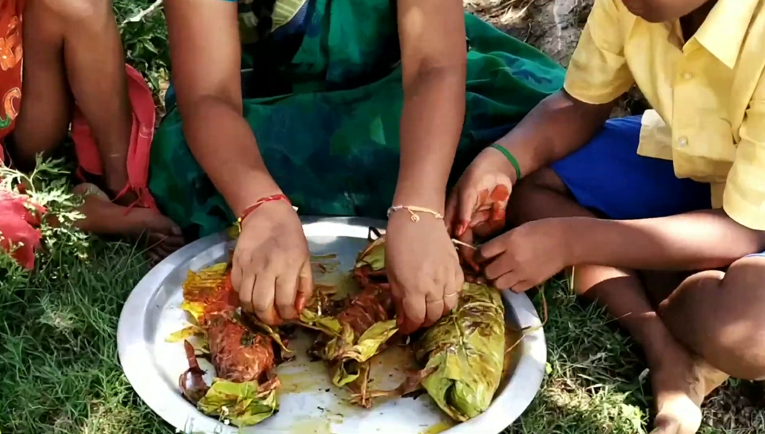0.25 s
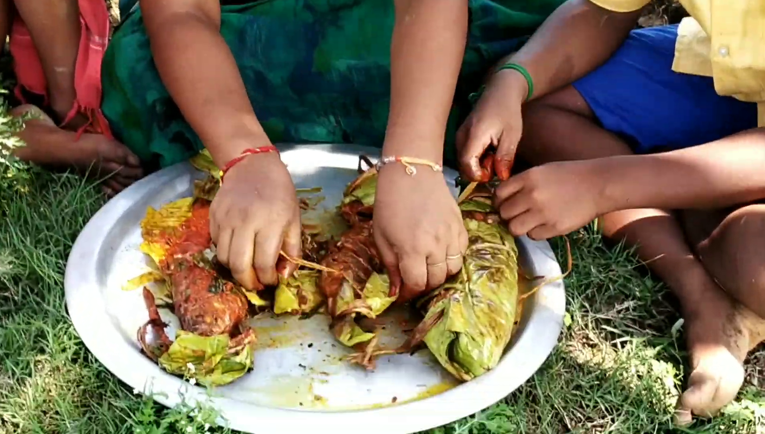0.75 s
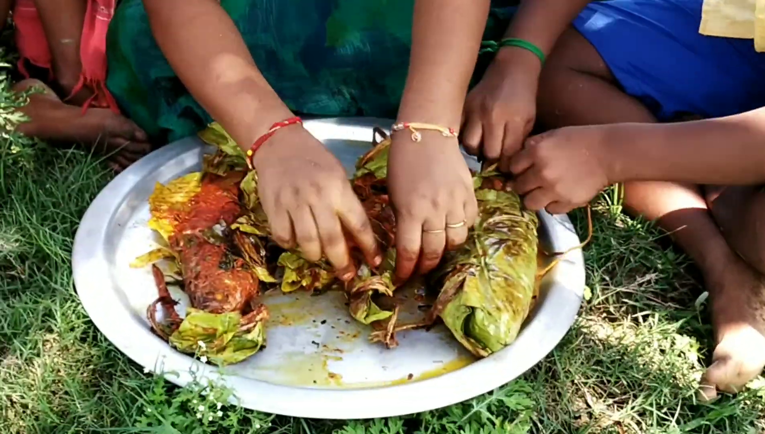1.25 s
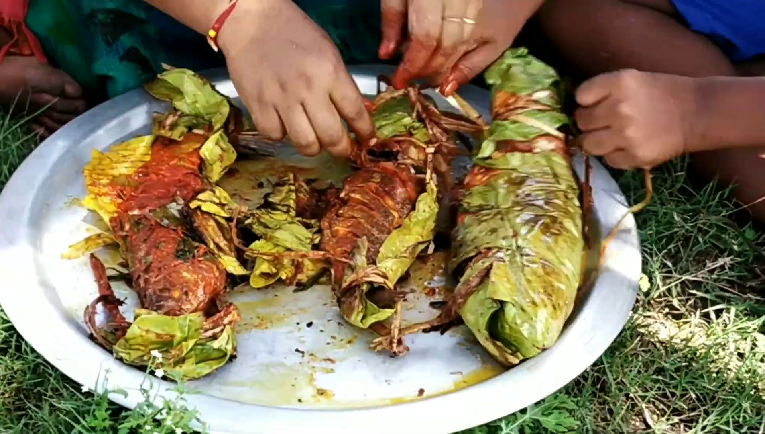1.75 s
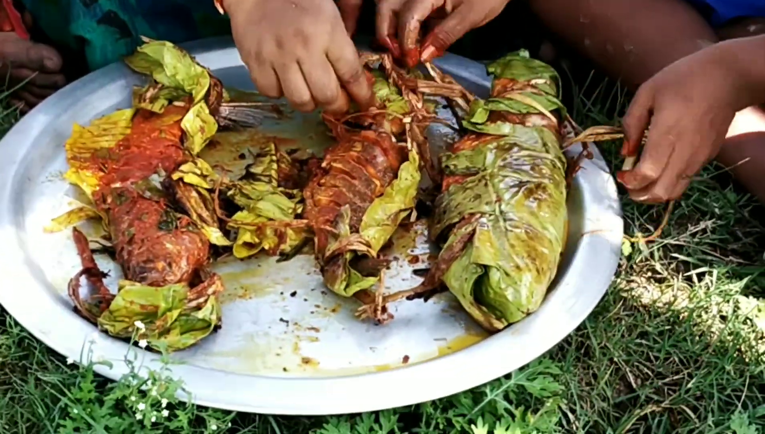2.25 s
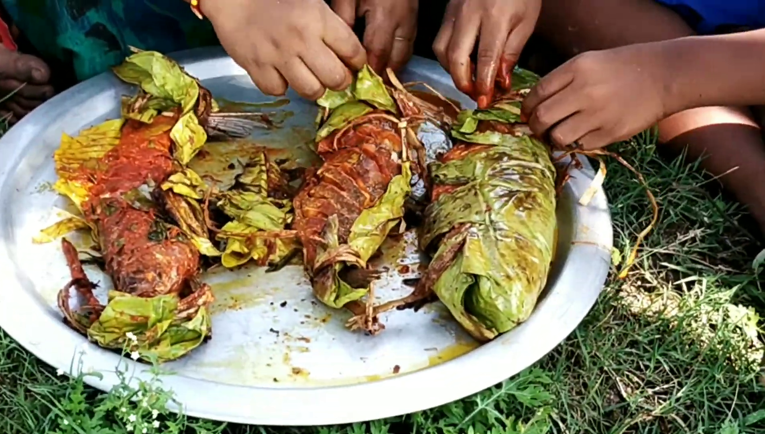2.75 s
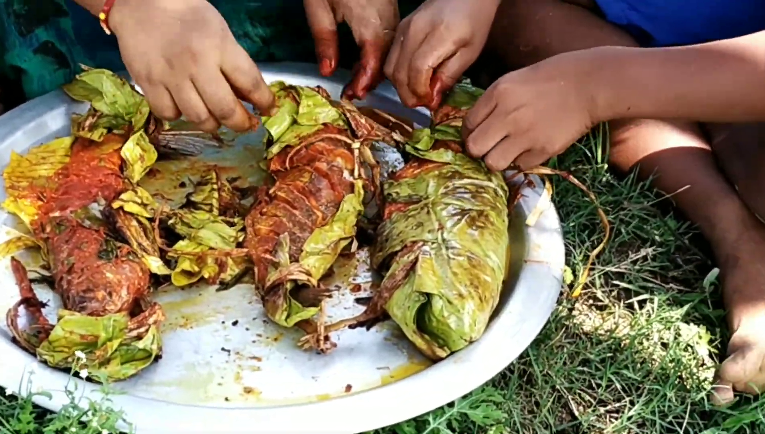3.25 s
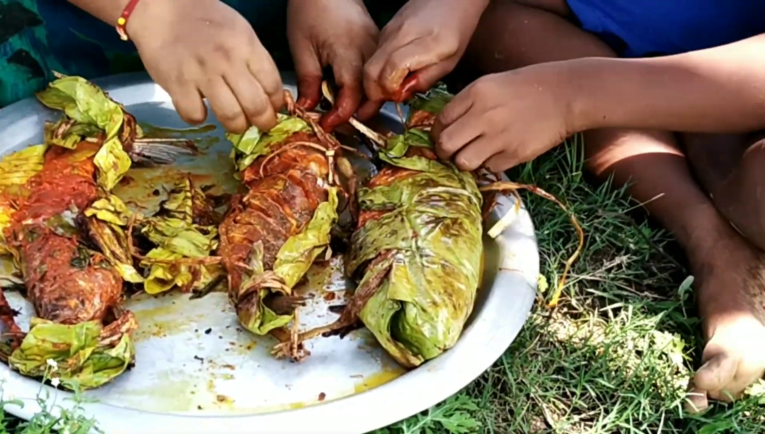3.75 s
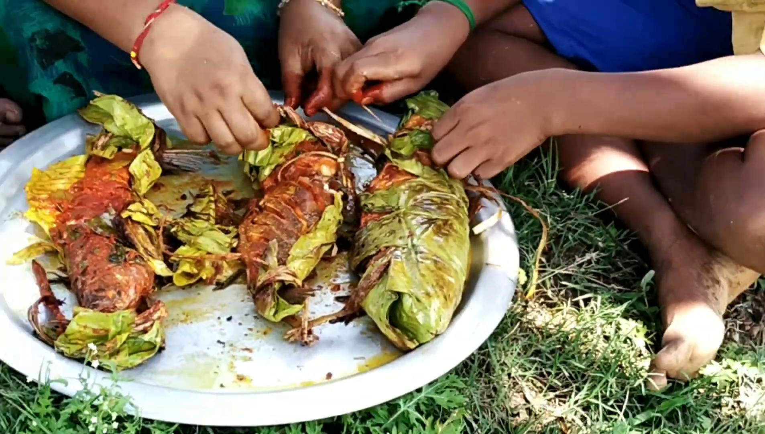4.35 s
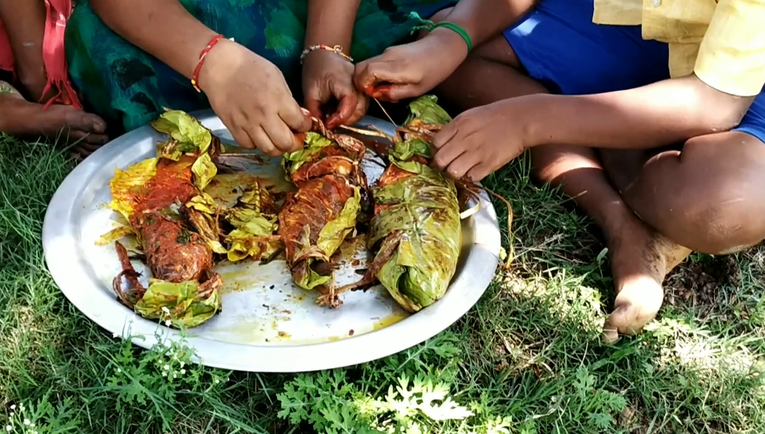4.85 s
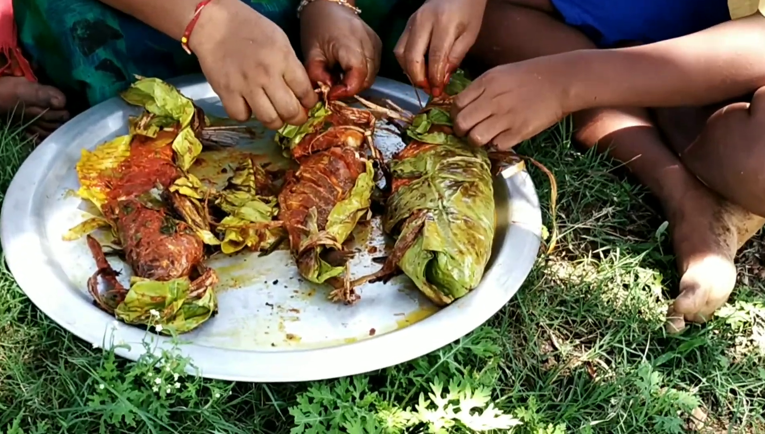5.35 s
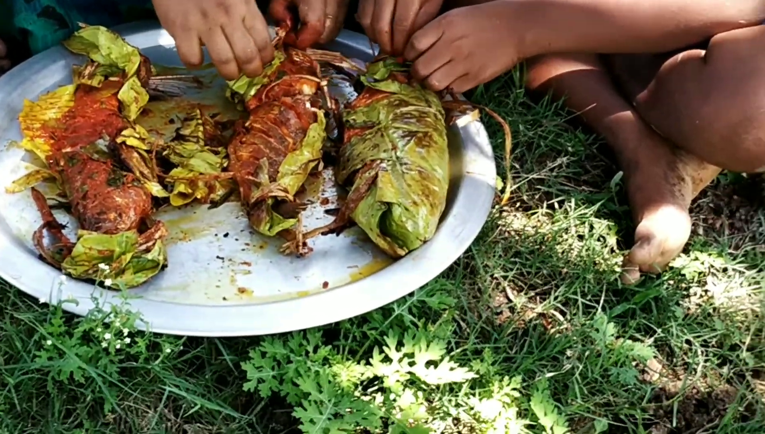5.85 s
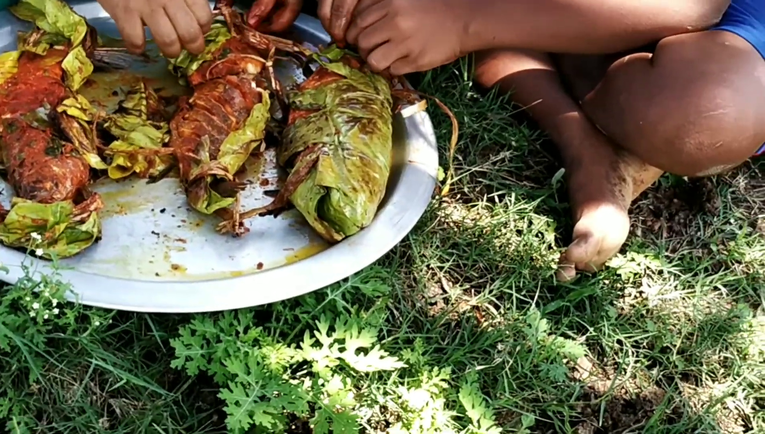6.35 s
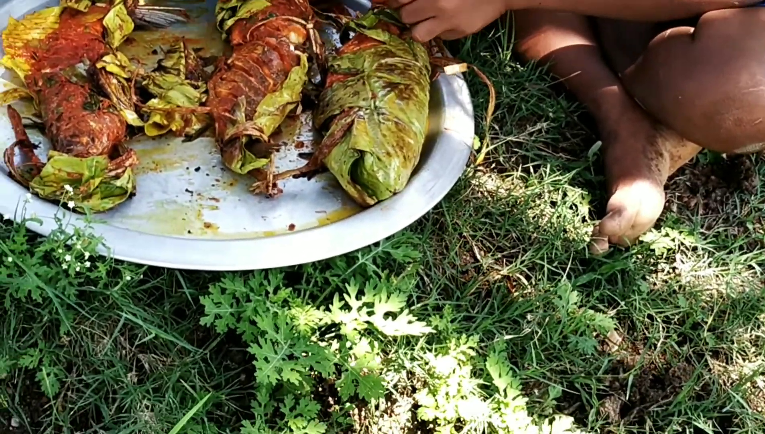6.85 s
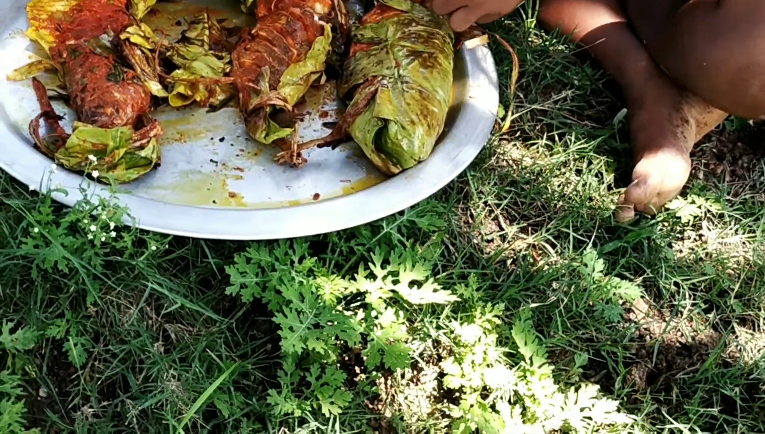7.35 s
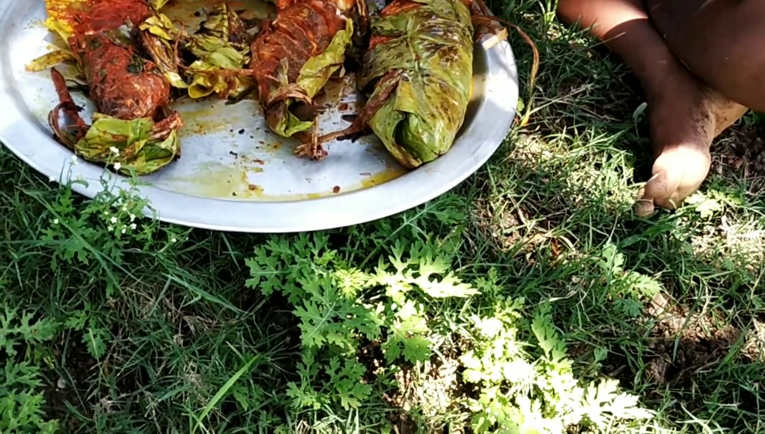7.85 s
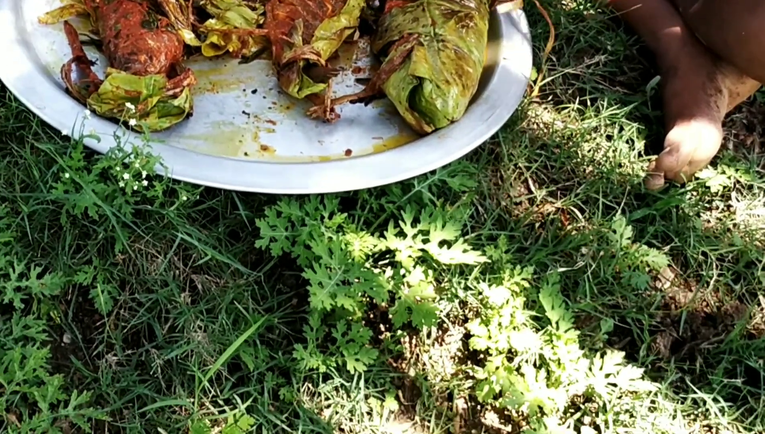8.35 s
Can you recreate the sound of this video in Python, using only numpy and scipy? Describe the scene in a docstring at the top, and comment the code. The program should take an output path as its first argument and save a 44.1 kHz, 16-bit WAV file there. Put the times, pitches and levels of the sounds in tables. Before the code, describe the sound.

Outdoors in a quiet field, a close cricket gives short, bright, pulsing chirps about two and a half times a second, with brief gaps. Low wind rumbles and flutters unevenly on a handheld phone microphone, strongest after six seconds. Fingers tick and bump its case, mostly on the left, with dull low thuds. Leaves crackle and swish faintly, and a far bird whistles thinly beneath a soft hiss.

```python
"""Open field: a cricket chirps steadily in the grass while a leaf wrapping is handled beside a phone.
The cricket is trains of sliding tones, direct, echoed and scattered. Wind on the phone's two ports is
shaped noise with swirls and push-pull pulses. Fingers tick, puff and drag on the case, setting off low
rings; the wrapping is short bursts and swells of band-passed noise. A far bird whistles over a soft hiss."""
import sys
import numpy as np
from scipy import signal
from scipy.fft import rfft, irfft
from scipy.io import wavfile
from scipy.ndimage import uniform_filter1d

SR = 44100
rng = np.random.default_rng(int(sys.argv[2]) if len(sys.argv) > 2 else 0)


def wav_record(signal):
    """Record a signal, one row per channel, as 16-bit PCM in the file named by sys.argv[1]."""
    frames = np.transpose(np.atleast_2d(signal))
    bounded = np.clip(frames, -1, 1)
    # unit amplitude maps onto the largest positive 16-bit level
    quanta = np.round(bounded * 32767).astype(np.int16)
    wavfile.write(sys.argv[1], SR, quanta)


N = 380009
TIME = np.arange(N) / SR


def undb(db):
    """Decibels to gain."""
    return 10 ** (np.asarray(db) / 20)


def unit(x):
    """Scale to rms 1."""
    return x / np.sqrt(np.mean(x ** 2))


def pan(db):
    """Left and right gains of mean power 1 for a left minus right level."""
    gains = undb(np.array([np.atleast_1d(db), -np.atleast_1d(db)]) / 2)
    return gains / np.sqrt(np.mean(gains ** 2, axis=0))


def add(out, s, x):
    """Mix a short sound in at s seconds."""
    start = max(int(s * SR), 0)
    out[:, start:start + x.shape[-1]] += x[..., :max(N - start, 0)]


def filt(x, hz, kind, order=2):
    """Butterworth filter."""
    hz = np.minimum(hz, SR / 2 - 1000)
    return signal.sosfilt(signal.butter(order, hz, kind, fs=SR, output="sos"), x)


def band(x, hz, ratio, order=2):
    """Band-pass from hz / (1 + ratio) to hz * (1 + ratio)."""
    return filt(x, [hz / (1 + ratio), hz * (1 + ratio)], "bandpass", order=order)


def noise(points):
    """Unrelated left and right noise of rms 1 with a (Hz, dB) spectrum that falls away at both ends."""
    hz, db = np.transpose(points)
    bins_hz = np.maximum(np.arange(N // 2 + 1) * SR / N, 1)
    skirts = np.minimum(bins_hz / hz[0], 1) ** 2 * np.minimum(hz[-1] / bins_hz, 1) ** 4
    gain = undb(np.interp(np.log(bins_hz), np.log(hz), db)) * skirts
    white = rng.standard_normal((2, N))
    return unit(irfft(rfft(white) * gain, N))


def walk(rate_hz):
    """Random curve with a spread near 1: normal knots at rate_hz joined by straight lines."""
    knots = rng.standard_normal(int(N / SR * rate_hz) + 2)
    return np.interp(TIME * rate_hz, np.arange(len(knots)), knots)


def air(gain_db=5, distant_db=-8, lag_samples=17):
    """Soft hiss of the open field; a part comes from the right and reaches the left port later."""
    # hiss spectrum: (frequency [Hz], level [dB])
    air_spectrum = [(150, -13), (300, -14), (450, -9), (725, -11), (1000, -13), (1390, -13.5), (2070, -12),
                    (2740, -13.5), (3520, -14.5), (6000, -15), (8200, -16), (10000, -19.5), (13000, -22.5),
                    (15000, -30)]
    # hiss before gain_db: (time [s], level [dB])
    hiss_level = [(0, -64.3), (1.2, -64.3), (3, -67.4), (8.6, -67.7)]
    distant = noise(air_spectrum)[0]
    from_right = np.array([np.roll(distant, lag_samples), distant])
    field = noise(air_spectrum) + undb(distant_db) * from_right
    return unit(field) * undb(gain_db + np.interp(TIME, *np.transpose(hiss_level)))


def bird(waver=0.022, echo_db=-5, echo_t60_s=0.53):
    """Thin whistles that waver and slide ever faster, blurred by distance and the trees."""
    # notes: (start [s], length [s], start pitch [Hz], fall [Hz], peak before echo [dB])
    notes = [(.47, 0.157, 2120, 90, -65), (2.677, 0.08, 2730, 480, -63.5), (3.056, 0.068, 2690, 300, -61),
             (3.223, .065, 1920, 50, -67), (3.444, 0.1, 2630, 514, -62.5), (3.648, 0.095, 2590, 857, -66.5),
             (3.849, 0.085, 2460, 262, -65), (4.049, 0.055, 2630, 403, -59), (4.247, 0.072, 2590, 332, -65),
             (4.867, .12, 4050, -300, -71), (5.218, 0.13, 2220, 118, -74), (8.382, 0.072, 2650, 124, -60.5)]
    out = np.zeros((2, N))
    for s, length_s, start_hz, fall_hz, db in notes:
        u = np.linspace(0, 1, int(length_s * SR))
        hz = start_hz * (1 + waver * walk(141)[:len(u)]) - fall_hz * u ** 2
        phase = 2 * np.pi * np.cumsum(hz) / SR
        add(out, s, undb(db) * np.sin(np.pi * u) * np.sin(phase))
    t = np.arange(SR // 2) / SR
    trees = rng.standard_normal((2, len(t))) * undb(-60 * t / echo_t60_s)
    echo = signal.fftconvolve(out, unit(trees) / np.sqrt(len(t)), axes=1)[:, :N]
    return out + undb(echo_db) * echo


def breeze(s):
    """Wind strength [dB re ordinary breeze] and left minus right port level [dB] at times s."""
    # breeze at the phone: (time [s], strength [dB], left minus right port [dB])
    gusts = [(0.0, -41, 3), (0.299, -48.5, 1.5), (0.75, -43.5, 14), (1.81, -52.5, -1), (1.96, -46, -1),
             (2.258, -51, 1.5), (3.32, -43.0, -2), (3.619, -44, 14), (3.921, -42.5, 1.5), (4.221, -41, 14),
             (5.281, -43.5, 6.5), (6.34, -40.0, -1), (6.789, -31, 1.5), (7.24, -33, 11), (7.694, -44.5, 3),
             (8, -32.5, 0.5), (8.3, -42.5, 11.5), (8.6, -45.5, -15.5)]
    ordinary_db = -45.5
    times, db, side_db = np.transpose(gusts)
    return np.interp(s, times, db) - ordinary_db, np.interp(s, times, side_db)


def wind(rumble_db=-41, flutter_db=-55.0, shelter_db=3.5, flutter_side_db=6.5):
    """Each port has its own eddies: slow rumble, and uneven flutter that grows faster with the breeze."""
    # spectra: (frequency [Hz], level [dB])
    rumble_spectrum = [(26, -27), (40, -2.5), (56, 2), (75, 2), (110, -4.5), (160, -13.5), (250, -34.5),
                       (400, -59)]
    flutter_spectrum = [(70, -6), (140, 5.5), (210, -1), (300, -8), (420, -19.5), (650, -30.5), (1000, -38)]
    rumble_growth, flutter_growth = 0.87, 1.06  # dB per dB of breeze
    gust_db, side_db = breeze(TIME)
    swirl_db = 2 * walk(11)
    rumble = noise(rumble_spectrum) * undb(rumble_db + rumble_growth * gust_db + swirl_db)
    port_db = 3.4 * np.array([walk(60), walk(60)])
    eddy_db = swirl_db + 2.2 * walk(25) + port_db
    flutter = noise(flutter_spectrum) * undb(flutter_db + flutter_growth * gust_db + eddy_db)
    side_db = side_db + shelter_db * walk(8.8)  # the two ports are sheltered differently
    return rumble * pan(side_db) + flutter * pan(side_db + flutter_side_db)


def swirls(lump_db=3):
    """Air brushes past a port: a short, lumpy swell that reaches higher than the steady rumble."""
    # spectrum: (frequency [Hz], level [dB])
    swirl_spectrum = [(110, 2.5), (200, 3.5), (300, -7), (450, -17), (700, -25.5)]
    # swells: (middle [s], half-length [s], level [dB], left minus right [dB])
    swells = [(.04, 0.098, -46, 30), (0.183, 0.084, -46.5, 16), (0.682, 0.086, -46.5, 22),
              (3.308, 0.04, -43.5, 5), (3.442, 0.18, -48.5, 22), (3.805, 0.039, -41, 19),
              (3.952, 0.094, -43, 8), (4.197, .04, -45.5, 24), (4.306, 0.051, -44.5, 24),
              (4.548, 0.02, -52, -14), (4.71, 0.11, -47, 23), (5.227, 0.12, -46.5, 26),
              (5.642, 0.083, -48.5, -3), (5.823, 0.12, -47.5, 18), (6.02, 0.046, -58, -8),
              (6.112, 0.077, -42.5, 4), (6.508, 0.074, -39, 1)]
    out = np.zeros((2, N))
    turbulence = unit(noise(swirl_spectrum) * undb(lump_db * walk(70)))
    for s, half_s, db, side_db in swells:
        swell = np.cos(np.pi / 2 * np.clip((TIME - s) / half_s, -1, 1)) ** 2
        out += pan(side_db) * undb(db) * swell * turbulence
    return out


def buffets(count=30, small_db=-43, small_hz=150, growth=0.88):
    """A passing eddy pushes, then pulls on a port; small random ones come more often and harder in gusts."""
    # strongest eddies: (time [s], peak before panning [dB], centre [Hz], left minus right [dB])
    strong = [(0.177, -44, 238, 17), (0.858, -40.5, 303, 18), (1.237, -37.5, 206, 23), (6.151, -42, 257, 3),
              (6.358, -20.5, 155, -31), (6.879, -21, 109, -27), (7.021, -23, 86, 20),
              (7.141, -25.5, 182, -31), (7.237, -31.5, 223, 21), (7.798, -28, 134, -27)]
    out = np.zeros((2, N))
    t = np.arange(-SR // 50, SR // 50) / SR
    passed = np.cumsum(undb(breeze(TIME)[0]) ** 2)
    times = np.interp(rng.uniform(0, 1, count), passed / passed[-1], TIME)
    chance = rng.standard_normal((count, 3))
    small = []
    for s, gust_db, port_db, (size, pitch, side) in zip(times, *breeze(times), chance):
        db = small_db + growth * gust_db + 2 * size
        small.append((s, db, small_hz * 1.2 ** pitch, port_db + 10 * side))
    for s, db, hz, side_db in [*strong, *small]:
        u = 2 * np.pi * hz * t
        push_pull = -u * np.exp((1 - u ** 2) / 2)
        add(out, s + t[0], pan(side_db) * undb(db) * push_pull)
    return out


def bright_burst(db, hz, side_db, t60_s=.013):
    """A short bright burst: band-passed noise that dies away at once."""
    t = np.arange(SR // 10) / SR
    burst = band(rng.standard_normal((2, len(t))) * undb(-60 * t / t60_s), hz, 0.26)
    return pan(side_db) * undb(db) * burst / np.abs(burst).max()


def wrapping(count=50, crackle_db=-57, crackle_hz=7000):
    """Leaves snap, crackle faintly at random and swish under the hands; two finger ticks get bright edges."""
    # short bright bursts: leaf snaps, and the bright edge of finger ticks at .355 and 8.356 s:
    # (time [s], peak before panning [dB], centre [Hz], left minus right [dB])
    bursts = [(.074, -35.5, 4560, 0), (.355, -28.5, 8050, 18), (0.879, -40, 8900, 6),
              (0.882, -39.5, 4840, 3), (1.6416, -31, 5000, -1), (1.642, -28.5, 12500, -5),
              (2.0537, -35.5, 10700, -8), (8.356, -19.5, 10200, 27)]
    # hands on leaves: (middle [s], half-length [s], centre [Hz], level [dB])
    slides = [(.095, .07, 3500, -70), (0.538, 0.15, 2060, -69), (1.256, 0.076, 1900, -65),
              (1.345, 0.046, 12000, -61), (1.497, 0.026, 9000, -61), (2.209, 0.33, 3730, -66.5),
              (2.554, 0.21, 1870, -68.5), (4.27, .23, 1680, -64.5), (5.291, 0.24, 2050, -69.5),
              (5.803, .23, 1760, -67.5), (6.213, .03, 3400, -65)]
    out = np.zeros((2, N))
    for s, *shape in bursts:
        add(out, s, bright_burst(*shape))
    times = rng.uniform(0, N / SR, count)
    for s, (size, octaves, side) in zip(times, rng.uniform(-1.5, 1, (count, 3))):
        add(out, s, bright_burst(crackle_db + 5 * size, crackle_hz * 2 ** octaves, 5 * side))
    for s, half_s, hz, db in slides:
        swell = np.hanning(int(2 * half_s * SR))
        swish = unit(band(rng.standard_normal((2, len(swell))), hz, 0.35))
        add(out, s - half_s, undb(db) * swell ** 2 * swish)
    return out


def case(x, hz):
    """A touch heard through the case: soft skin dulls it above hz and the shell resonates."""
    # resonances: (frequency [Hz], half-width [share of frequency], level [dB])
    modes = [(490, .2, 2), (720, .18, 3), (1400, .08, -2), (2030, .08, 0), (4250, .06, -3), (8200, .06, 1)]
    soft = filt(filt(x, hz, "lowpass", order=1), min(4500 + 2 * hz, 13000), "lowpass")
    ringing = sum(undb(db) * band(soft, mode_hz, width, order=1) for mode_hz, width, db in modes)
    return soft + ringing


def knocks(slip_db=3, side_db=27.5):
    """A finger ticks, puffs air at the port and sets off a low ring; at times skin drags in small slips."""
    # fingers, before panning: (time [s], click peak [dB], dull above [Hz], puff [dB], low ring [dB])
    touches = [(.354, -16, 2240, -21, -32.5), (0.3558, -19, 250, -31.5, -48),
               (1.092, -27.5, 450, -24, -16.5), (1.0945, -28.5, 1100, -24, -47),
               (1.117, -28.5, 397, -32.5, -46), (1.642, -33.5, 1800, -46, -57),
               (1.886, -38.5, 700, -50, -29.5), (2.077, -33, 350, -62, -29.5),
               (2.1122, -38.5, 200, -38, -32.5), (4.0702, -24.5, 220, -26.5, -16.5),
               (5.517, -50, 250, -48, -43), (8.3565, -10, 3580, -27.5, -24.5)]
    # dragging fingertips, before panning: (start [s], fade time [s], level [dB], dull above [Hz])
    rubs = [(0.051, 0.038, -53.5, 1200), (0.36, 0.042, -47, 700), (1.098, 0.03, -43, 150),
            (1.233, 0.086, -56, 200), (2.056, 0.035, -51, 395), (5.494, .03, -59, 500),
            (8.353, 0.041, -38.5, 8000)]
    # the ring starts higher and sags, as the recorder's bass cut answers the push
    ring_end_hz, ring_t60_s, ring_lag_s = 49.5, 0.13, 0.00396
    ring_rise, ring_sag_s = 0.62, 0.011
    puff_hz, tick_grit, tick_t60_s = 211, .1, .005
    out = np.zeros((2, N))
    sides = pan(side_db)  # the fingers sit by the left port
    t = np.arange(SR // 5) / SR
    ring_hz = ring_end_hz * (1 + ring_rise * np.exp(-t / ring_sag_s))
    low_ring = -np.sin(2 * np.pi * np.cumsum(ring_hz) / SR) * undb(-60 * t / ring_t60_s)
    # air is pushed into the port, then drawn back
    puff = np.sin(2 * np.pi * puff_hz * t) * np.exp(-(puff_hz * t) ** 2)
    for s, click_db, hz, puff_db, ring_db in touches:
        grit = tick_grit * rng.standard_normal(len(t)) * undb(-60 * t / tick_t60_s)
        click = case((t == 0) + grit, hz)
        click = click / np.abs(click).max()
        add(out, s, sides * (undb(click_db) * click + undb(puff_db) * puff))
        add(out, s + ring_lag_s, sides * undb(ring_db) * low_ring)
    for s, fade_s, db, hz in rubs:
        slips = rng.standard_normal(len(t)) * undb(slip_db * walk(457)[:len(t)])
        add(out, s, sides * undb(db) * unit(case(slips, hz)) * np.exp(-(t / fade_s) ** 3))
    return out


def wing_stroke(length_s, hz, octave_db=-29):
    """The scraper runs down the file and slows, so the wing's tone slides down."""
    u = np.linspace(0, 1, int(length_s * SR))
    teeth = .005 * unit(uniform_filter1d(rng.standard_normal(len(u)), 30))
    slide = .07 * (.5 - u) + .055 * np.exp(-u / .07)
    phase = 2 * np.pi * np.cumsum(hz * (1 + slide + teeth)) / SR
    pressure = np.abs(np.sin(np.pi * u ** .85)) ** .7
    return pressure * (np.sin(phase) + undb(octave_db) * np.sin(2 * phase))


def chirp(last_db, count=8):
    """Strokes grow louder, longer, higher and slower; yields (s from last stroke, sound), last one first."""
    first_hz, last_hz = 5715, 5860
    first_s, last_s, swell = .0068, .0106, .9
    tension_hz = 10 * rng.standard_normal()
    offset_s = 0
    for k in range(count):
        early = k / (count - 1)
        length_s = last_s + (first_s - last_s) * early
        hz = last_hz + (first_hz - last_hz) * early + tension_hz + 20 * rng.standard_normal()
        stroke_db = last_db * (k == 0) + .8 * rng.standard_normal()
        size = (1 - k / count) ** swell * undb(stroke_db)
        yield offset_s - length_s / 2, size * wing_stroke(length_s, hz)
        offset_s -= .0142 - .0005 * k + .0075 * np.exp(-k / .65)


def cricket(gain_db=-3, scatter_db=-12, scatter_t60_s=.26):
    """Chirps arrive directly, off two nearby surfaces, and scattered by the plants."""
    # chirps: (middle of last stroke [s], level before gain_db [dB], last stroke trim [dB])
    chirps = [(0.279, -40, -1), (0.702, -39, -0.5), (1.1018, -36, -1.5), (1.5, -37, -4), (1.925, -37, 0.5),
              (2.38, -42, 0.5), (2.7733, -42.5, -1), (3.165, -40, -1.5), (3.545, -41, -3.5),
              (3.966, -41.5, -4), (4.3873, -40.5, -3), (4.775, -41, -1.5), (5.16, -41, -1.5),
              (5.656, -43, -1.5), (6.463, -43.5, -2.5), (6.8673, -44.5, 0), (7.2655, -43, 1),
              (7.682, -43.5, -5.5), (8.0592, -40, -3), (8.423, -40, -1)]
    # nearby surfaces: (mean delay [s], level before indirect trim [dB])
    echoes = [(.0107, -16), (.0235, -15.5)]
    # as the phone moves: (time [s], left minus right [dB], indirect trim [dB])
    bearings = [(.3, 13, 7), (1.1, 9.5, .5), (1.5, 7, 1.5), (3.6, 4, 4.5), (4.5, 12, 5.5), (5.7, .5, 6),
                (6.5, 6, 7.5), (7.7, 9.5, 12), (8.45, 7, 7)]
    out = np.zeros((2, N))
    t = np.arange(SR // 5) / SR
    tail = undb(-60 * t / scatter_t60_s)
    times, *bearing = np.transpose(bearings)
    for s, db, last_db in chirps:
        paths = rng.standard_normal((2, len(t))) * tail
        paths *= undb(scatter_db) / np.sqrt(np.sum(paths ** 2, axis=1, keepdims=True))
        for delay_s, echo_db in echoes:
            # the moving phone changes each path a little
            arrival_s = delay_s * rng.uniform(.9, 1.1, 2)
            paths[[0, 1], (arrival_s * SR).astype(int)] += undb(echo_db)
        side_db, indirect_db = (np.interp(s, times, column) for column in bearing)
        for offset_s, stroke in chirp(last_db):
            stroke = stroke * undb(db + gain_db)
            indirect = signal.fftconvolve(paths, stroke[None], axes=1)
            # the direct sound weakens a little as the indirect grows
            add(out, s + offset_s, pan(side_db) * undb(-indirect_db / 4) * stroke)
            add(out, s + offset_s, pan(side_db) * undb(indirect_db) * indirect)
    return out


def scene():
    """All sources at the phone."""
    return air() + bird() + wind() + swirls() + buffets() + wrapping() + knocks() + cricket()


def record(dry, bass_hz=38, top_hz=15700):
    """The phone drops the deepest bass and cuts the top."""
    lean = filt(dry, bass_hz, "highpass", order=4)
    return signal.sosfilt(signal.ellip(8, .2, 70, top_hz, fs=SR, output="sos"), lean)


dry = scene()
out = record(dry)
wav_record(out)
```